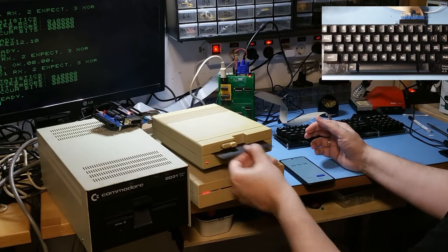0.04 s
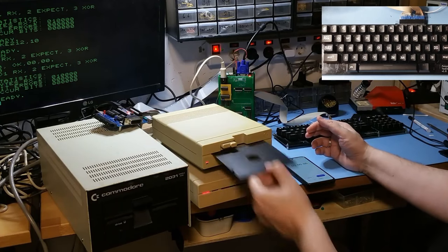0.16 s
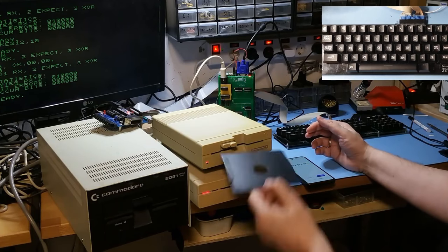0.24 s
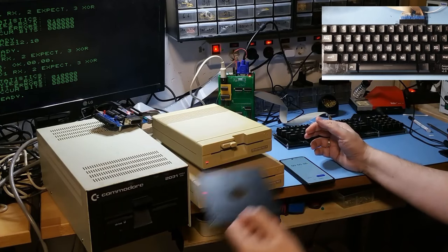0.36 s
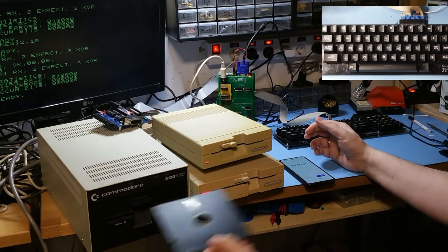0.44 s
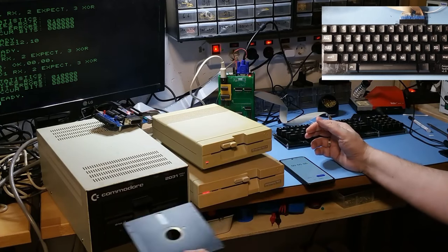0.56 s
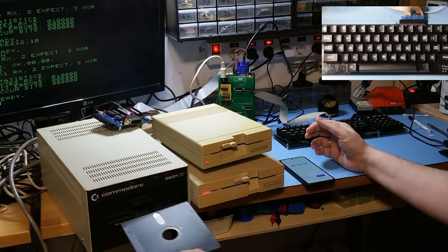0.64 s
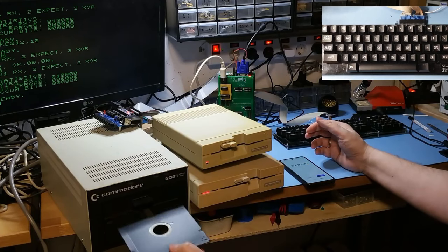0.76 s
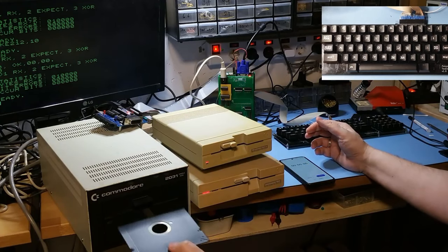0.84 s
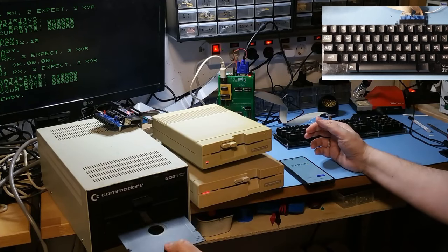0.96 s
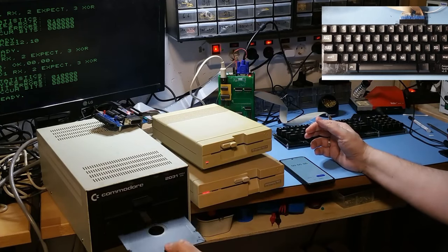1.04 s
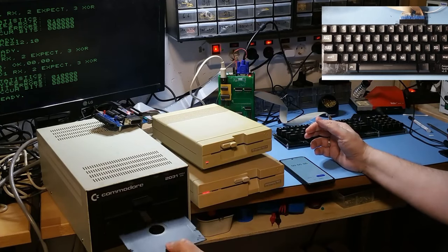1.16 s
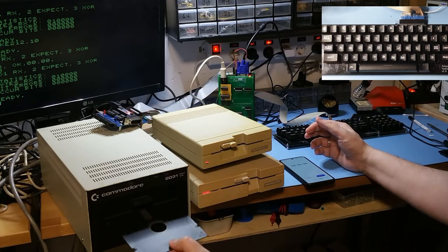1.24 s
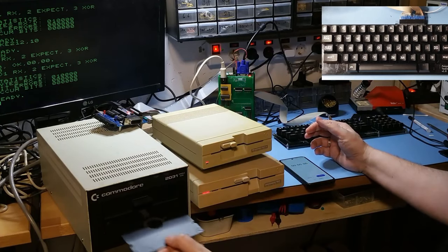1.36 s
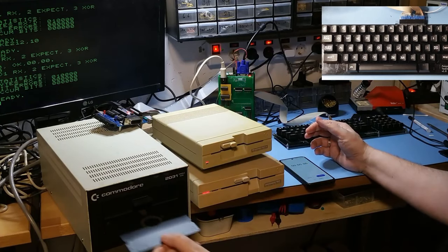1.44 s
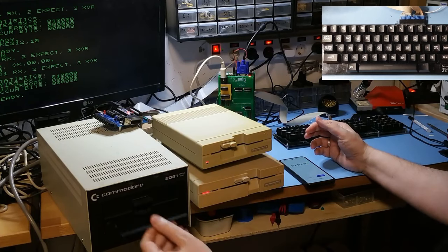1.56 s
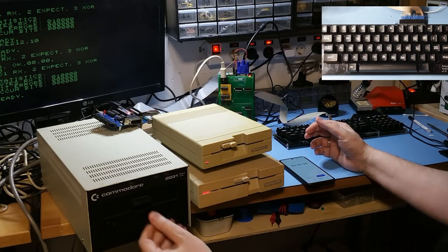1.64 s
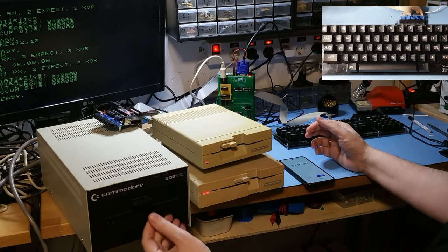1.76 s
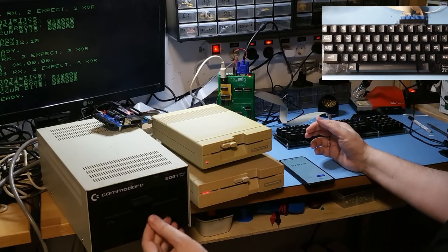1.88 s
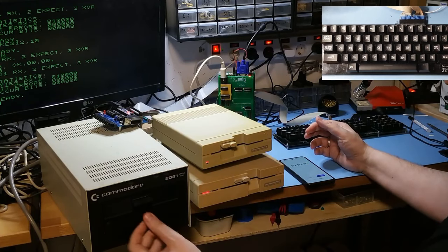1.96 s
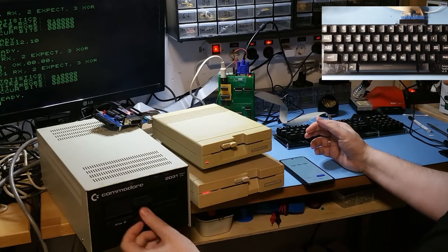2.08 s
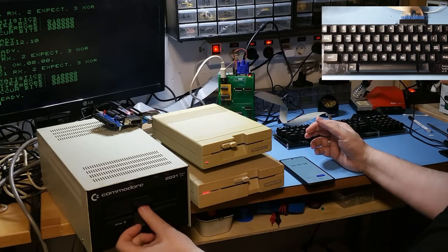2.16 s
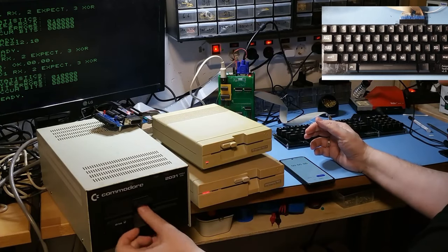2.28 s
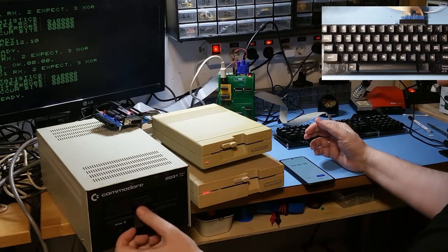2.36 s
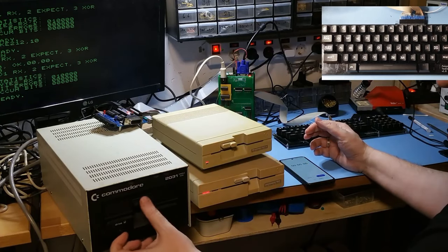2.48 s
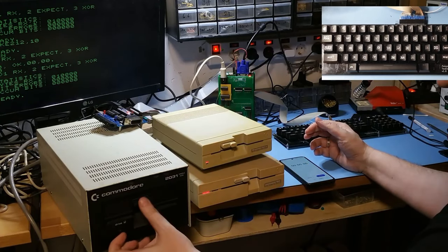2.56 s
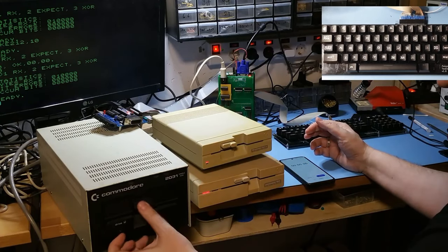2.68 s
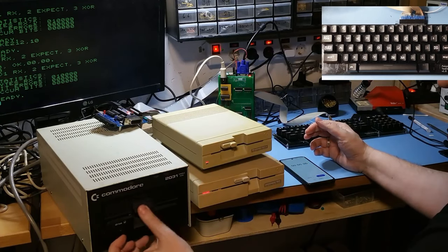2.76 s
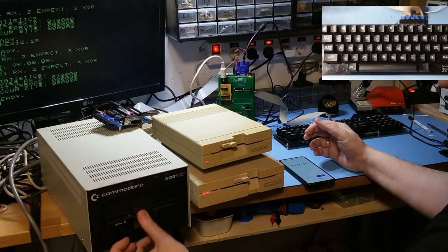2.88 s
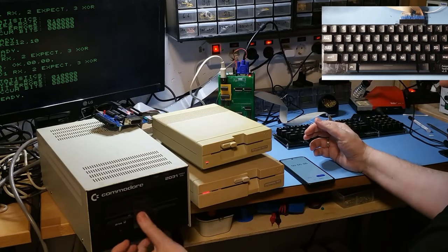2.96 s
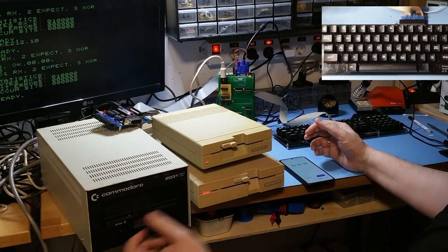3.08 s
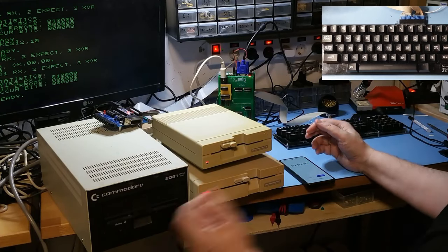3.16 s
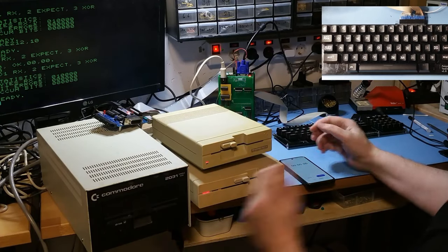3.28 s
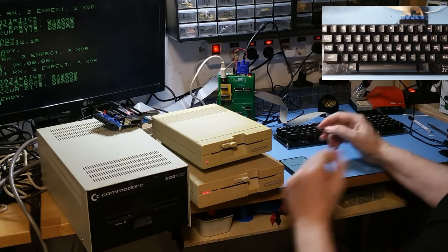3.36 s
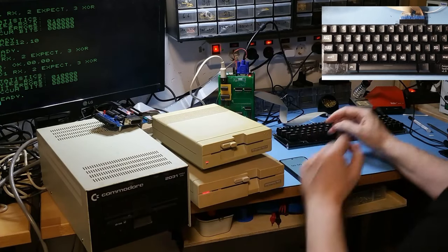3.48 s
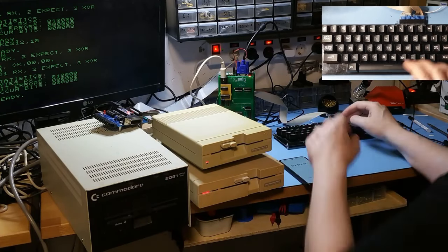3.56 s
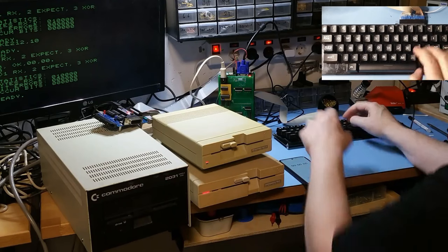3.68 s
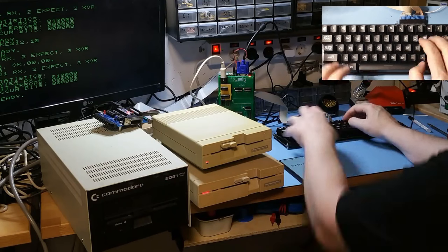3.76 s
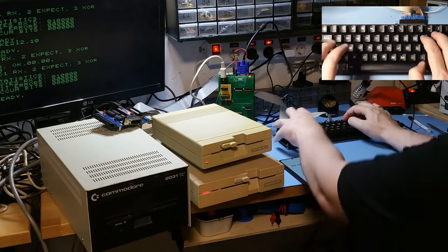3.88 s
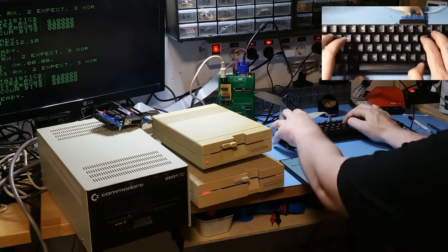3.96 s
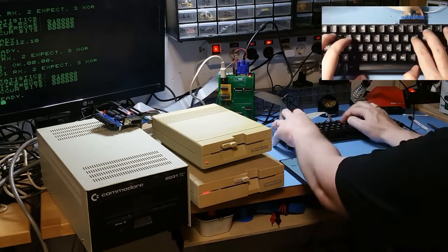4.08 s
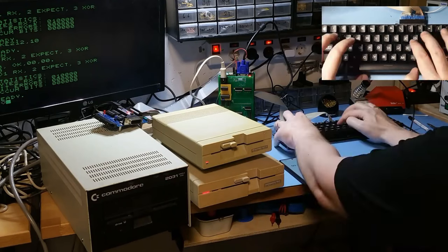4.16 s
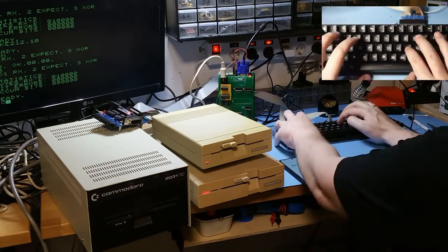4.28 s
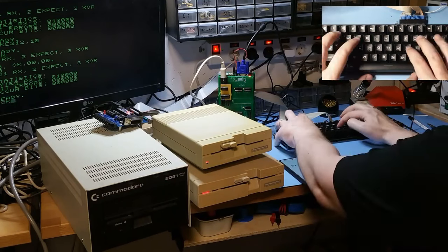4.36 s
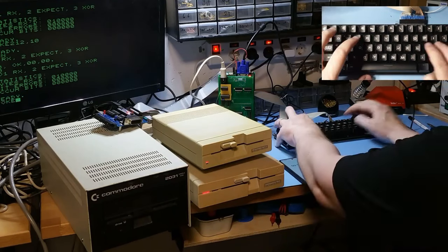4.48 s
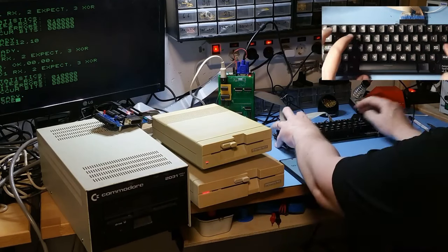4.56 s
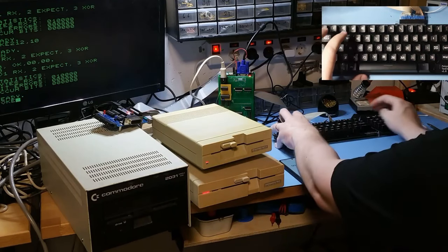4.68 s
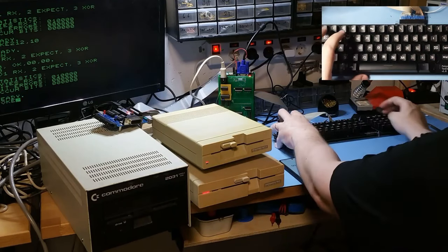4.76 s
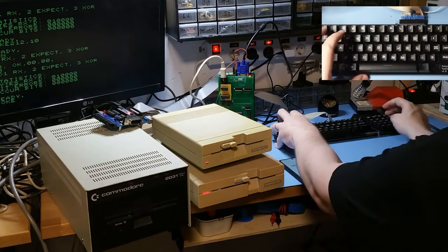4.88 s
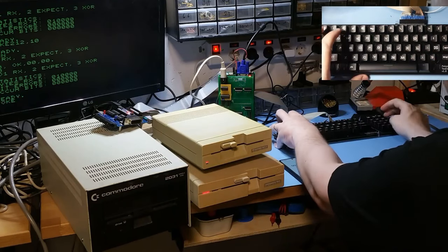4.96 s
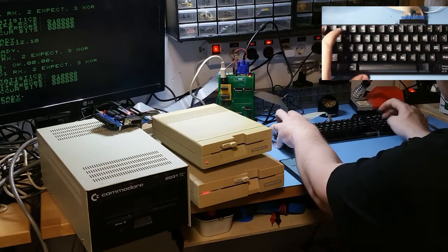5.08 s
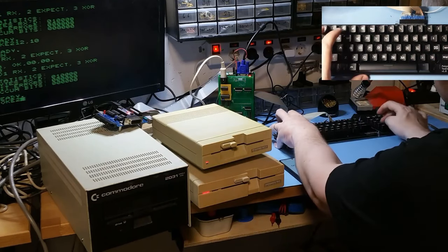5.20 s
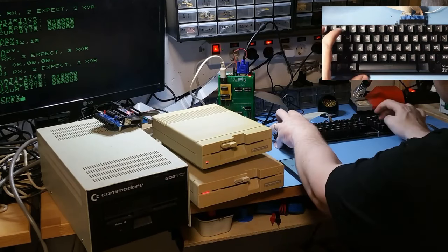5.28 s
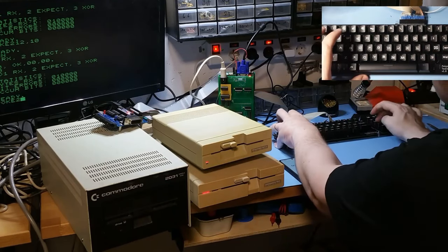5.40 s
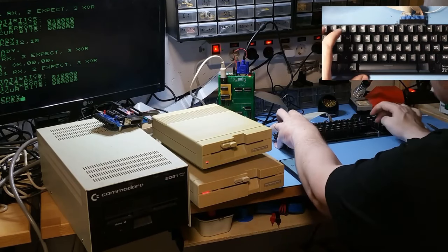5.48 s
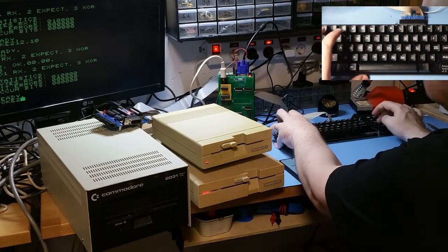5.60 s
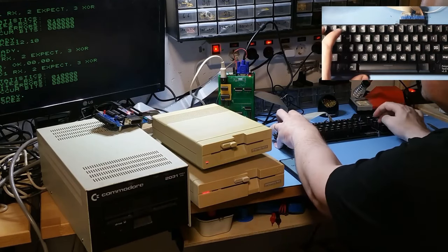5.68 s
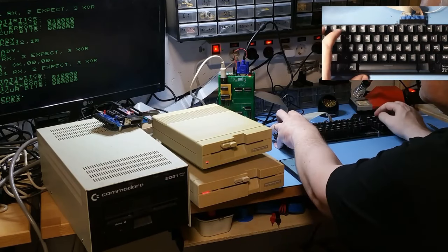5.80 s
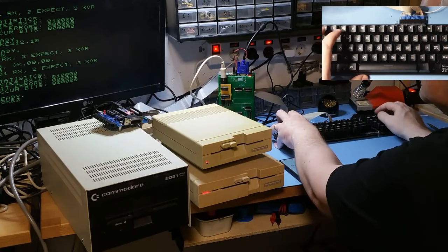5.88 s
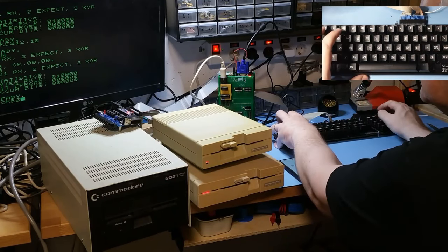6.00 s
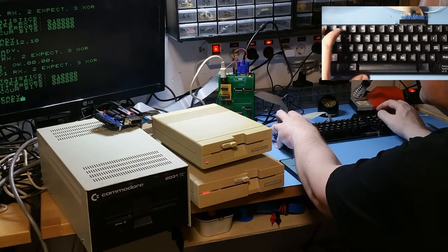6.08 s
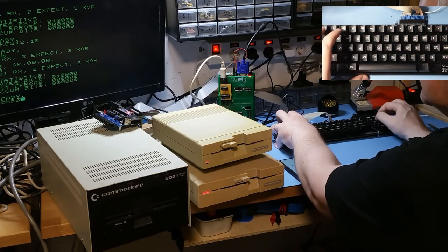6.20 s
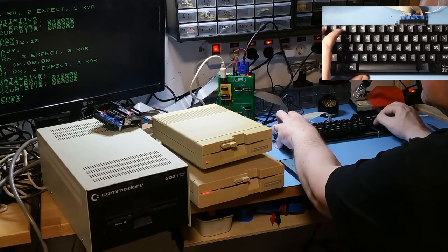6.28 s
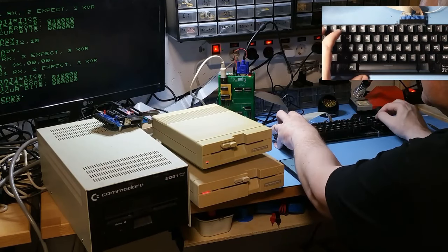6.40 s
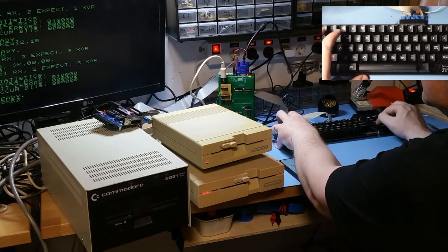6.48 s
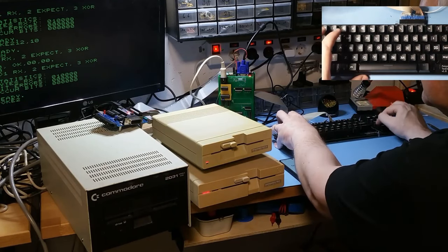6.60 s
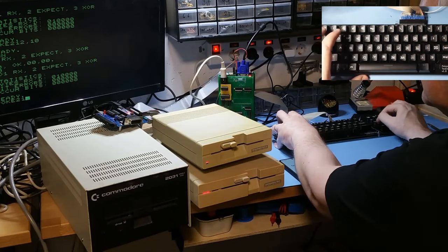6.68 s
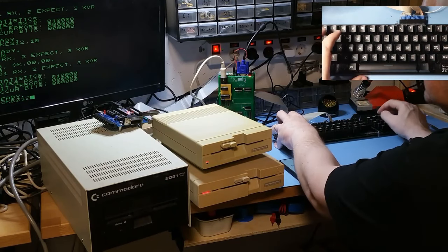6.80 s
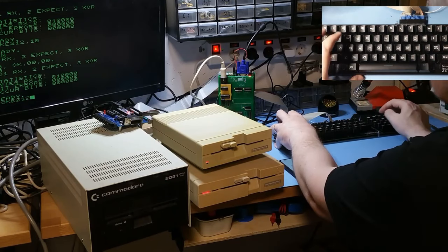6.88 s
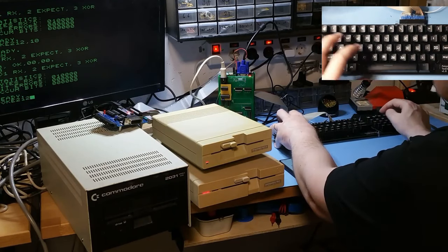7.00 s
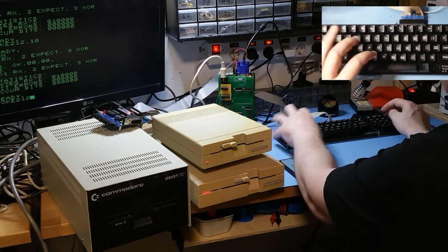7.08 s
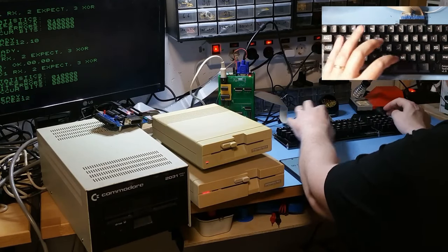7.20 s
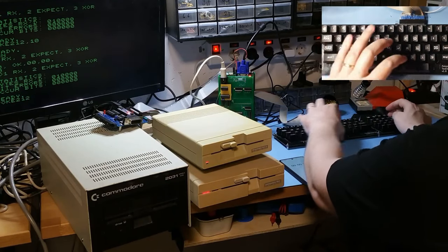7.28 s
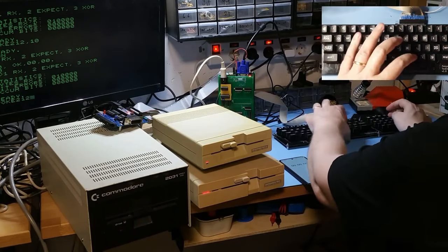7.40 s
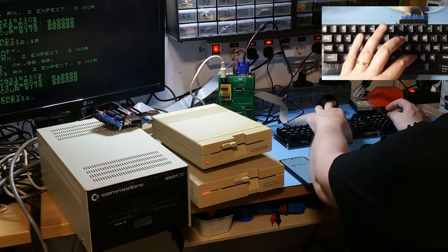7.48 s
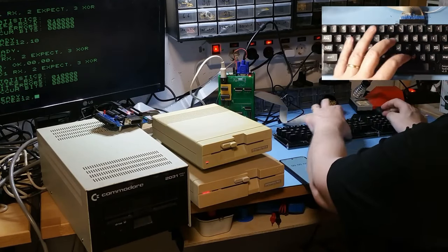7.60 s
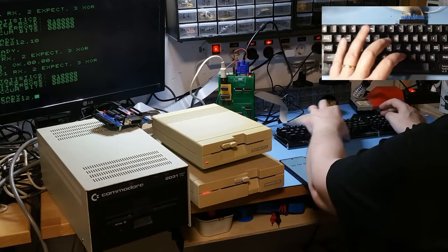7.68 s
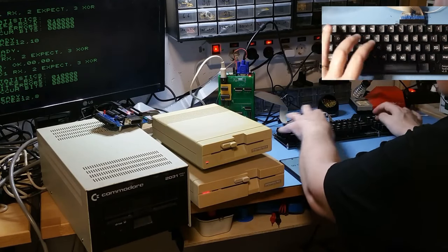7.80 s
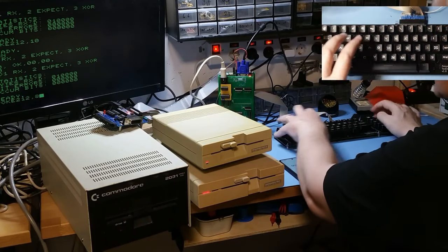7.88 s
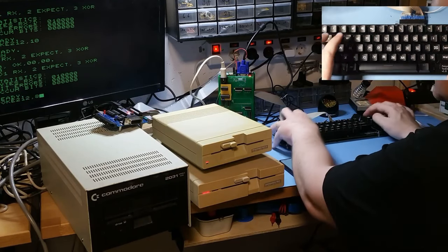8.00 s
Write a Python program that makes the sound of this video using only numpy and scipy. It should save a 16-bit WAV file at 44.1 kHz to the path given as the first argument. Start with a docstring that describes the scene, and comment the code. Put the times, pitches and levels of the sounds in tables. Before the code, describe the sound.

In a small room, a close microphone picks up a steady low electronic hum and faint fans. A lever rubs and clacks, and a floppy disk slides into a drive, scraping and ticking, until the latch shuts with a sharp, loud snap. After a faint rustle of cloth and a knock on the desk, someone types a few crisp keystrokes at a time, with pauses and soft, deep thuds between them.

```python
"""A workbench in a small room, one close microphone; the equipment hums and its fans rush from the start.
A drive's lever rubs and clacks, then a floppy disk scrapes into a drive and is latched with a
loud snap, while soft thuds boom through the bench. A sleeve rustles and a hand knocks on the desk.
Then keys are typed in short bursts: each trips its switch, lands on the plate and springs back."""
import sys
import numpy as np
from scipy import signal
from scipy.fft import rfft, irfft, next_fast_len
from scipy.io import wavfile
from scipy.ndimage import uniform_filter1d, map_coordinates

SR = 44100
rng = np.random.default_rng(int(sys.argv[2]) if len(sys.argv) > 2 else 0)


def dump_mix(stems):
    """Bounce the given channels to the path in sys.argv[1] as a 16-bit WAV at rate SR."""
    frames = np.atleast_2d(stems).T  # one column per channel
    limited = np.clip(frames, -1, 1)  # hard clip at full scale
    pcm = np.round(limited * 32767).astype(np.int16)
    wavfile.write(sys.argv[1], SR, pcm)


N = 354872
T = np.arange(SR // 2) / SR  # time since a blow

# resonances of a drive's panels and levers: f/Hz, width/Hz, level/dB
DRIVE_MODES = [(292, 60, 5), (379, 30, 2), (430, 30, 3.5), (504, 32, 4), (712, 35, -4.5), (868, 45, -1),
               (935, 45, -1.5), (1053, 62, -2), (1567, 45, 1), (1741, 35, 0), (2253, 75, 0),
               (2795, 110, -4), (3454, 60, -1), (3838, 70, 2), (4481, 130, -4), (6445, 130, 5),
               (8290, 400, -3), (9000, 350, 1.5), (10230, 360, -4), (13000, 900, -9)]
# keystrokes: t/s, trip/dB, time to bottom out/s, bottoming/dB, held/s, release/dB,
# then the key's own voice: plate/dB, spring/dB, click/dB, keycap/Hz, spring/Hz
KEYSTROKES = [(3.8669, -24, .0048, -21.5, 0.11, -32.5, -6, -4.5, -6, 2640, 8150),
              (4.0643, -28, .0054, -25.5, 0.078, -31, -1.5, -2, 1.5, 2770, 8500),
              (4.241, -27.5, 0.0026, -29, 0.071, -37, 1, -1, -0.5, 3050, 8210),
              (4.3200, -20, .006, -23.5, .086, -29, -7, -6, -9.5, 2680, 8060),
              (5.0896, -27, .015, -31.5, 0.079, -31.5, -2.5, 2.5, 4, 3120, 8500),
              (6.1727, -42.5, .002, -40.5, .076, -38.5, 5.5, -4, -12, 3240, 8650),
              (6.3824, -41, .002, -37.5, 0.1, -47, 7, -7, 6, 2940, 8100),
              (6.39, -34.5, .0115, -32.5, .084, -39.5, 4.5, 4, 11, 3430, 8100),
              (6.5735, -30, .0096, -36, .069, -34, -2, -1, 2, 3170, 8400),
              (7.3607, -29, 0.0018, -25, 0.082, -36, 5, 2.5, -4, 3130, 8370),
              (7.7039, -29.5, .003, -42, 0.062, -39.5, -12, 2.5, 4.5, 3090, 8600),
              (7.9917, -20.5, 0.0047, -22.5, .042, -33, 3.5, -8, -4.5, 2940, 9400)]


def drives(pivot_hz=3000):
    """Lever, disk and latch strike the drives: a tick first, then the slower panels and heavy case."""
    # lever, disk going in, latch; harder edges are brighter: t/s, level/dB, tilt/(dB/octave), panel/dB
    contacts = [(.029, -22.5, 4.5, 5), (.078, -29.5, 2, 2), (.28, -48, -2.5, -9), (0.847, -51, 0, -9),
                (0.869, -51, -2.2, 3), (1.139, -29, -1, 4.5), (1.155, -35, -4, 1.5),
                (1.377, -32.5, -0.9, -3), (1.393, -40, 8, 19), (1.426, -37.5, -2.5, 3),
                (1.552, -45.5, -3.5, -1), (1.913, -42.5, -2, 12), (2.0362, -33.5, 2, -8),
                (2.046, -23.5, -0.5, 3.5), (2.152, -49.5, -5, 3), (2.204, -49.5, -2.5, 0),
                (2.5, -41, -2.2, 2), (2.656, -35.5, -2.4, -5.5), (2.705, -36.5, -2.1, -0.5),
                (2.765, -40, -2.5, 5.5), (2.812, -12, 2.5, -13), (2.814, -9.5, -1.15, -2.5)]
    # bands of case, panel, lever, tick and edge: low/Hz, high/Hz
    part_bands = [(195, 720), (720, 2200), (2200, 6600), (6000, 11000), (11400, 18000)]
    # how those five parts swing and settle: t60/s, attack/s, level/dB
    parts = [(0.11, 0.0019, -4), (0.071, .0016, -4.5), (0.035, .0004, 0), (.047, .00037, -6),
             (.028, 0.00025, -11.5)]
    track = np.zeros(N)
    for s, strength_db, tilt, panel_db in contacts:
        sound = np.zeros(len(T))
        for (lo_hz, hi_hz), (t60, attack, db), extra_db in zip(part_bands, parts, [0, panel_db, 0, 0, 0]):
            octaves = np.log2(np.sqrt(lo_hz * hi_hz) / pivot_hz)
            gain = amp(strength_db + db + extra_db + tilt * octaves)
            sound += gain * crest(band(drive_part(t60, attack), lo_hz, hi_hz))
        add(track, s, room(sound, wet_db=-4.5, build=0.0047))
    return track


def drive_part(t60, attack, ring_db=-4.0):
    """One contact rattles the case and rings its resonances."""
    # spectrum of the drive's case: f/Hz, level/dB
    case_spectrum = [(100, -26.5), (170, -10), (240, -3.5), (480, 0.5), (680, -2), (900, -2), (1250, -3),
                     (1700, -4.5), (2800, -13), (3800, -13), (5400, -16.5), (8500, -13.5), (12000, -18.5),
                     (16000, -30)]
    modes = [(hz, width, db + rng.normal(0, 4.1)) for hz, width, db in DRIVE_MODES]
    ringing = resonate(1. * (T == 0), modes) * (1 - np.exp(-T / attack))
    return colour(unit(burst(t60, attack)) + amp(ring_db) * unit(ringing), case_spectrum)


def disk(grain_db=2.0, scratch_db=-8, scratches_per_s=420):
    """A lever rubs, then the jacket slides into the slot; its edges catch and the panels answer."""
    # spectrum of the sliding jacket: f/Hz, level/dB
    jacket = [(150, -2), (280, -4), (480, -3.5), (700, -2.5), (950, -4.5), (1250, 3), (1600, 0.5),
              (2300, -3), (5000, -6), (8000, -11), (12000, -22), (16000, -26.5)]
    # pushes of the disk into the drive: hardest/s, stop/s, scrape/dB, hiss/dB
    pushes = [(1.382, 1.55, -38, -37.5), (1.79, 1.817, -53, -59.5), (1.928, 2.03, -38.5, -39.5)]
    catches = unit((rng.random(N) < scratches_per_s / SR) * rng.standard_normal(N))
    grain = unit(rng.standard_normal(N) * amp(grain_db * wobble(650) + 2.1 * wobble(60)))
    friction = grain + amp(scratch_db) * catches
    panels = resonate(friction, DRIVE_MODES)
    body = unit(band(colour(0.5 * friction + panels, jacket), 187, 2830))
    surface = unit(band(colour(friction + 0.24 * panels, jacket), 1800, 18000))
    lever_rub = amp(-36.5) * swell(0.032, rise_db_per_s=260, fall_db_per_s=105)
    track = lever_rub * (surface + .5 * body)
    for s, stop_s, scrape_db, hiss_db in pushes:
        effort = swell(s, 108, 42.5) * swell(stop_s, 0, 200)
        track += effort * (amp(scrape_db) * body + amp(hiss_db) * surface)
    return track


def keys(down_s=.01, up_s=.012):
    """Each key trips its switch, bottoms out a moment later and springs back when the finger lifts."""
    # how each stage rings the key: plate/dB, keycap/dB, spring/dB, click/dB
    trip_mix = (-9.5, -4.5, -1.5, -12)  # the switch snaps: bright
    bottom_mix = (-3.5, -4, -9.5, -17.5)  # the stem lands on the plate: dull
    release_mix = (-6, -5, -5, -17.5)
    track = np.zeros(N)
    for s, trip_db, sink_s, bottom_db, held_s, release_db, *key in KEYSTROKES:
        plate_db, spring_db, click_db, cap_hz, spring_hz = key
        voice = np.array([plate_db, 0, spring_db, click_db])
        for delay, levels in [(0, voice + trip_db + trip_mix), (sink_s, voice + bottom_db + bottom_mix)]:
            down = key_blow(levels, cap_hz, spring_hz, t60=.031, travel_s=down_s,
                            lead_s=0.0002, scuff_db=-9, rebound_db=-13)
            add(track, s + delay - down_s, room(down, wet_db=-2.5, build=0.012))
        up = key_blow(voice + release_db + release_mix, cap_hz, spring_hz, t60=0.034, travel_s=up_s,
                      lead_s=0.00048, scuff_db=-9.5, rebound_db=-18)
        add(track, s + held_s - up_s, room(up, wet_db=-2.0, build=0.014))
    return band(track, 700, 19000, order=2)


def key_blow(levels, cap_hz, spring_hz, t60, travel_s, lead_s, scuff_db, rebound_db, rebound_s=0.003):
    """The stem scuffs along its guide, trips the switch, hits its stop and rebounds."""
    # resonances of the mounting plate and the switch's click: f/Hz, width/Hz, level/dB
    plate_modes = [(1450, 820, -2.5), (2210, 760, 11)]
    click_modes = [(11130, 700, -8.5), (12500, 574, 3), (12600, 390, 7.5), (14900, 1280, -22)]
    # resonances of keycap and spring: ratio to the part's pitch, width/Hz, level/dB
    cap_modes = [(.95, 327, 4), (1.14, 479, 4), (1.45, 700, -3), (1.8, 1280, -8)]
    spring_modes = [(.88, 880, -4.5), (.995, 450, 3), (1.13, 750, -6)]
    hit = lambda delay: (T > delay) * amp(-60 * np.abs(T - delay) / t60)
    pitched = lambda modes, hz: [(ratio * hz, width, db) for ratio, width, db in modes]
    scuff = amp(scuff_db) * (T < travel_s) * np.sqrt(T / travel_s)
    stop = hit(travel_s) + amp(rebound_db) * hit(travel_s + rebound_s)
    trip = hit(travel_s - lead_s) + 0.19 * hit(travel_s + 0.00067) + 0.96 * scuff
    parts = [(plate_modes, stop), (pitched(cap_modes, cap_hz), stop + scuff),
             (pitched(spring_modes, spring_hz), trip), (click_modes, trip)]
    return sum(amp(db) * crest(resonate(force * rng.standard_normal(len(T)), modes))
               for db, (modes, force) in zip(levels, parts))


def knock(at_s=3.674):
    """A hand knocks on the desk top and rebounds; the bench booms underneath."""
    # spectrum of the desk top: f/Hz, level/dB
    desk_spectrum = [(70, -37), (120, 2.5), (190, -13.5), (290, 5), (400, -0.5), (550, -5), (710, -1),
                     (830, -5), (980, 1.5), (1300, -1.5), (1850, -3), (2400, -15.5), (3200, -28.5),
                     (8000, -52)]
    rattle = burst(t60=0.04, attack=0.00069)
    taps = 1.5 * rattle / np.linalg.norm(rattle)
    add(taps, 0, [1.])
    add(taps, .0052, [.75])  # the rebound
    rap = room(crest(colour(taps, desk_spectrum)), wet_db=-3.0, build=0.01)
    track = np.zeros(N)
    add(track, at_s, amp(-17) * rap + amp(-37) * boom())
    return track


def bench(start_hz=225, rise_hz=75):
    """Soft thuds boom through the bench with a hollow, rising ring; landing keys boom faintly."""
    # soft thuds: t/s, boom/dB, hollow ring/dB
    thuds = [(0.273, -34, -39), (2.037, -46, -33), (2.141, -35, -62), (2.184, -35.5, -60),
             (2.819, -31.5, -34.5), (3.314, -39.5, -50.5), (4.596, -36, -46), (5.112, -47, -43.5),
             (5.696, -40, -45.5), (7.112, -42, -42.5)]
    # spectrum of the hollow ring: f/Hz, level/dB
    hollow_spectrum = [(130, -34), (200, 6.5), (255, 14.5), (305, 12), (370, -28), (800, -25.5),
                       (2000, -71.5)]
    pitch = start_hz + rise_hz * (1 - np.exp(-T / 0.025))
    envelope = amp(-60 * T / 0.12) * (1 - np.exp(-T / 0.0061))
    rising = crest(np.sin(2 * np.pi * np.cumsum(pitch) / SR) * envelope)
    track = np.zeros(N)
    for s, boom_db, hollow_db in thuds:
        hollow = crest(colour(burst(t60=0.3, attack=0.015), hollow_spectrum), size=900)
        add(track, s, amp(boom_db) * boom() + amp(hollow_db) * (0.67 * hollow + 0.466 * rising))
    for s, _, _, bottom_db, _, _, plate_db, *_ in KEYSTROKES:
        add(track, s, amp(bottom_db + plate_db - 13.5) * boom())  # follows the force on the plate
    return track


def boom():
    """The deep answer of the bench to a push."""
    # spectrum of the booming bench: f/Hz, level/dB
    boom_spectrum = [(30, -40.5), (55, 4), (80, 6.5), (120, -9), (170, -16), (400, -52)]
    return crest(colour(burst(t60=0.24, attack=0.012), boom_spectrum), size=900)


def sleeve():
    """Cloth rustles as the arm moves to the keys."""
    # spectrum of rubbing cloth: f/Hz, level/dB
    cloth_spectrum = [(2000, -7), (5000, -3), (9000, -0.5), (15000, -13.5)]
    return amp(-57.5) * swell(3.52, rise_db_per_s=101, fall_db_per_s=22) * rush(cloth_spectrum)


def equipment(motor_hz=56.35):
    """The room tone: a deep motor hum, wavering mains and fan tones, and moving air."""
    # course of the motor hum: t/s, relative level/dB
    motor_levels = [(0.0, -37), (0.52, -36), (1.45, -37.5), (2.15, -35.5), (3.32, -37.5), (4.3, -43),
                    (5.24, -39), (6.43, -37), (8.05, -37)]
    # mains and fan tones: f/Hz, level/dB
    hum_tones = [(100, -61), (199.9, -69.5), (300, -69.5), (399.8, -59), (500, -80), (915, -69.5),
                 (1082, -66.5), (1147, -77), (1825, -74), (2089, -71)]
    # spectra of the fans' rush and the low rumble: f/Hz, level/dB
    fan_spectrum = [(59, -39), (100, -16), (129, -10.5), (170, -24), (202, -6.5), (229, -18), (295, -12.5),
                    (322, -13), (398, -11.5), (535, -16.5), (1100, -17), (1450, -22), (2080, -21),
                    (5080, -34.5), (16000, -40.5)]
    rumble_spectrum = [(15, -11.5), (30, -6), (45, -5), (70, 2), (100, -12.5), (150, -10), (250, -52)]
    t = np.arange(N) / SR
    motor_gain = amp(3 + np.interp(t, *np.transpose(motor_levels)))
    track = motor_gain * np.sin(2 * np.pi * motor_hz * t + .05 * wobble(4))
    for hz, db in hum_tones:
        gain = np.sqrt(2) * amp(db + 2.36 * wobble(3.205))
        track += gain * np.sin(2 * np.pi * hz * t + 0.396 * wobble(7.6))
    return track + amp(-52.5) * rush(fan_spectrum) + amp(-51) * rush(rumble_spectrum)


def room(x, wet_db, build):
    """A blow plus the small room's diffuse answer, which has its colour and dies faster in the treble."""
    # reverberation time: f/Hz, t60/s
    decay_times = [(150, 0.312), (500, 0.34), (1500, 0.31), (3500, 0.3), (8000, 0.27), (14000, 0.2)]
    energy = np.cumsum(np.abs(rfft(x)) ** 2)
    k = np.arange(len(energy))
    reach = k // 130 + 5
    lo, hi = np.maximum(k - reach, 0), np.minimum(k + reach, k[-1])
    tint = np.sqrt(np.abs(energy[hi] - energy[lo]) / (hi - lo))  # the blow's smoothed spectrum
    diffuse = irfft(tint * np.exp(2j * np.pi * rng.random(len(k))), len(x))
    hz, t, frames = signal.stft(diffuse, SR, nperseg=512)
    frames *= amp(-60 * t / along(decay_times, hz)[:, None])
    tail = signal.istft(frames, SR, nperseg=512)[1][:len(x)]
    tail *= 1 - np.exp(-(T / build) ** 4)
    return x + amp(wet_db) * tail * np.linalg.norm(x) / np.linalg.norm(tail)


def burst(t60, attack):
    """The dense rattle of one contact."""
    return rng.standard_normal(len(T)) * amp(-60 * T / t60) * (1 - np.exp(-T / attack))


def rush(spectrum):
    """Steady coloured noise of rms 1."""
    return unit(colour(rng.standard_normal(N), spectrum))


def swell(s, rise_db_per_s, fall_db_per_s):
    """A gain that grows to 1 at time s and fades again."""
    t = np.arange(N) / SR - s
    return amp(np.minimum(rise_db_per_s * t, -fall_db_per_s * t))


def wobble(rate):
    """A smooth random curve, rate knots a second."""
    return map_coordinates(rng.standard_normal(int(N * rate / SR) + 4), [np.arange(N) * rate / SR])


def resonate(x, modes):
    """Pass x through resonances: f/Hz, width/Hz, level/dB."""
    f = np.fft.rfftfreq(len(x), 1 / SR)
    response = sum((-1) ** k * amp(db) * 1j * f * width / (hz * hz - f * f + 1j * f * width)
                   for k, (hz, width, db) in enumerate(modes))
    return irfft(rfft(x) * response, len(x))


def colour(x, spectrum):
    """Minimum-phase filter of the given shape: f/Hz, level/dB."""
    m = 2 * next_fast_len(len(x) // 2 + 2048)
    gain = amp(along(spectrum, np.fft.rfftfreq(m, 1 / SR)))
    cepstrum = irfft(np.log(gain + 1e-6))
    cepstrum[1:m // 2] *= 2
    cepstrum[m // 2 + 1:] = 0
    return irfft(rfft(x, m) * np.exp(rfft(cepstrum)))[:len(x)]


def band(x, lo_hz, hi_hz, order=3):
    """Causal band-pass."""
    return signal.sosfilt(signal.butter(order, [lo_hz, hi_hz], "band", fs=SR, output="sos"), x)


def along(points, hz):
    """Interpolate (f/Hz, value) points on a log frequency axis."""
    f, values = np.transpose(points)
    return np.interp(np.log(hz + 1), np.log(f + 1), values)


def amp(db):
    """Decibels to gain."""
    return 10 ** (np.asarray(db) / 20)


def unit(x):
    """Scale to rms 1."""
    return x / np.sqrt(np.mean(x ** 2) + 1e-20)


def crest(x, size=256):
    """Scale a blow so that its loudest stretch of size samples has rms 1."""
    return x / np.sqrt(np.max(uniform_filter1d(x ** 2, size)) + 1e-20)


def add(track, s, sound):
    """Mix a sound in at time s."""
    part = track[max(round(s * SR), 0):][:len(sound)]
    part += sound[:len(part)]


def scene():
    """One close microphone, fed to both channels with a trace of hiss in each."""
    mono = sleeve() + keys() + drives() + disk() + knock() + bench() + equipment()
    return mono + amp(-78) * rng.standard_normal((2, N))


def record(dry):
    """The latch overloads the input; nothing is kept above 16 kHz."""
    clipped = np.clip(dry, -1, 1)
    m = next_fast_len(N + SR // 2)
    passband = np.fft.rfftfreq(m, 1 / SR) < 16000
    return irfft(rfft(clipped, m) * passband, m)[:, :N]


dry = scene()
out = record(dry)
dump_mix(out)
```